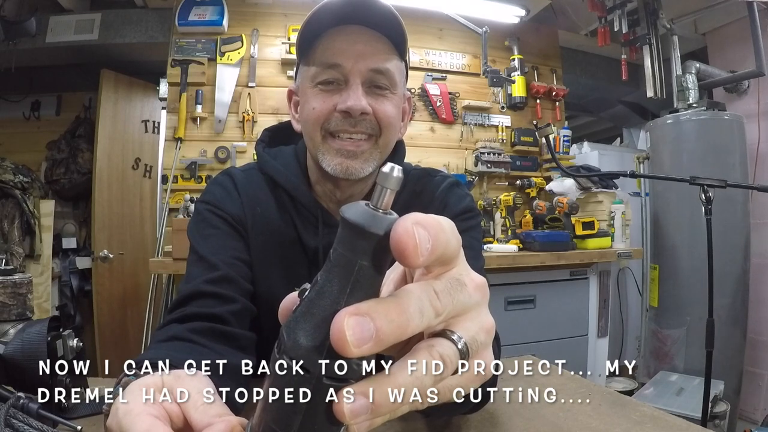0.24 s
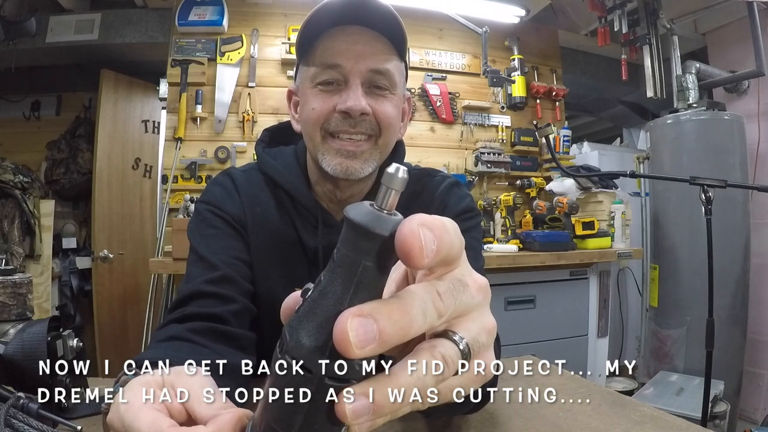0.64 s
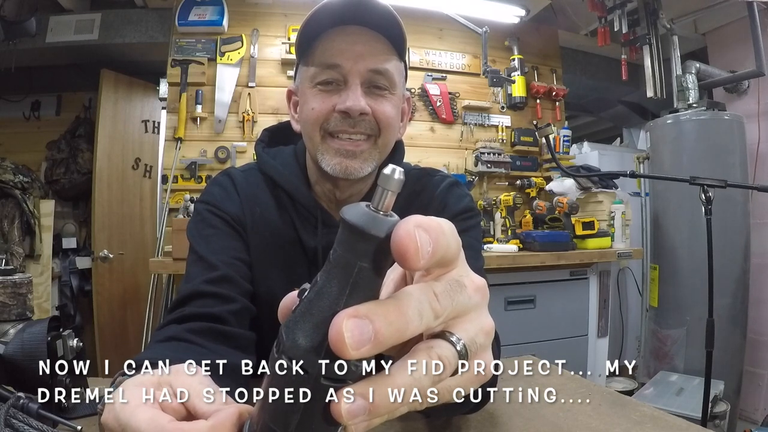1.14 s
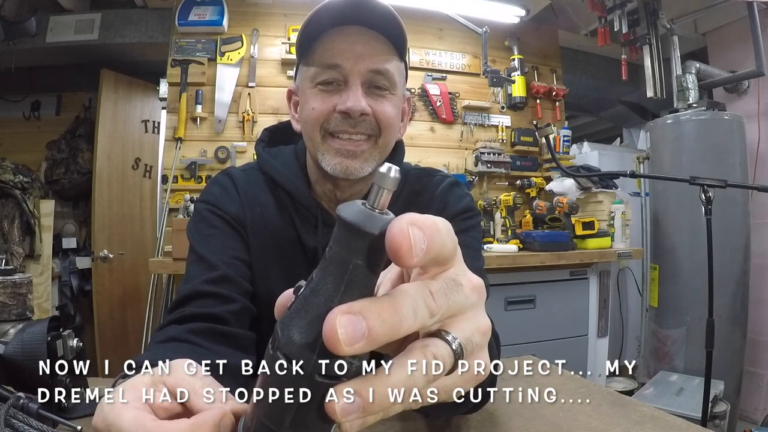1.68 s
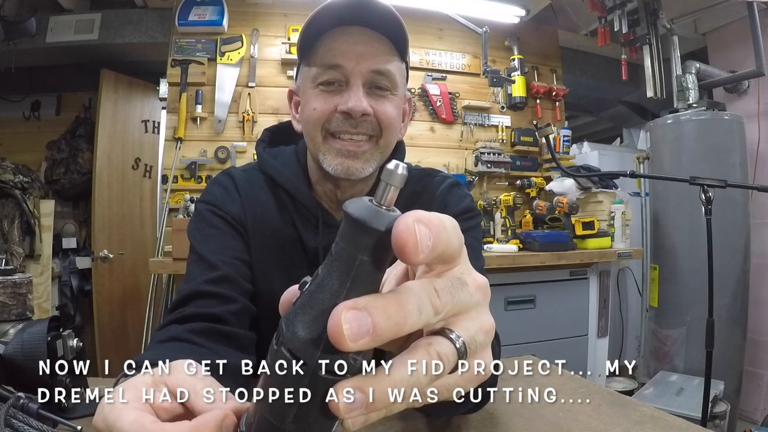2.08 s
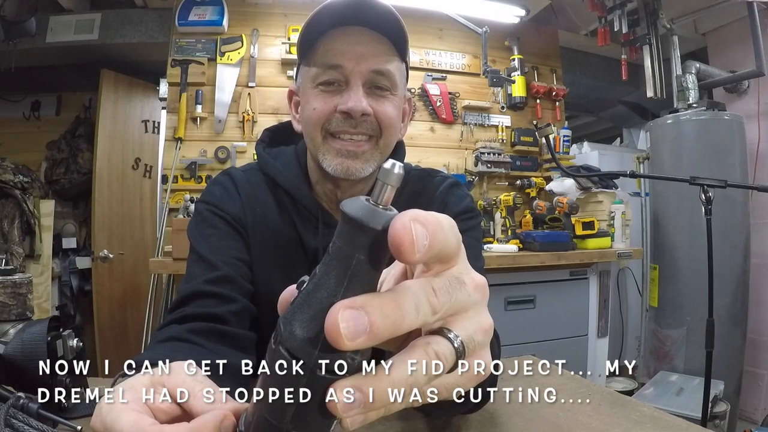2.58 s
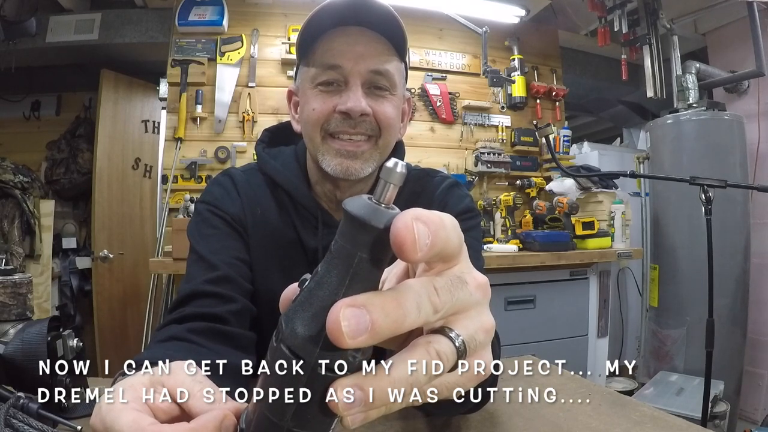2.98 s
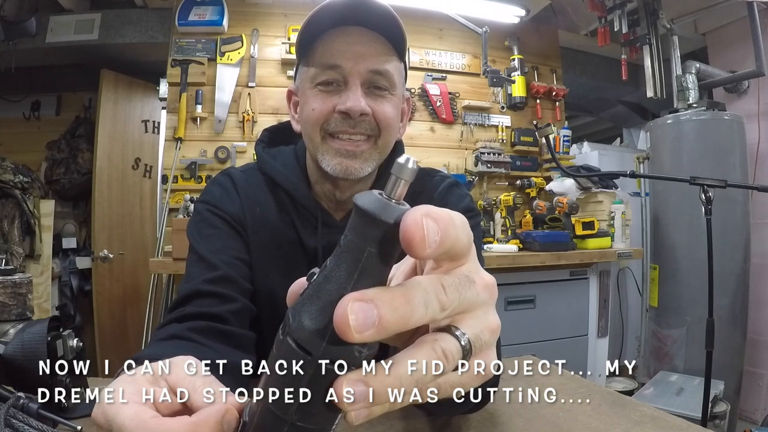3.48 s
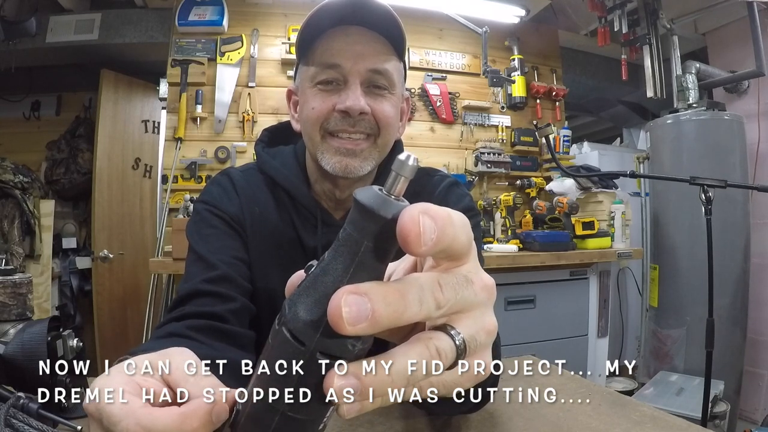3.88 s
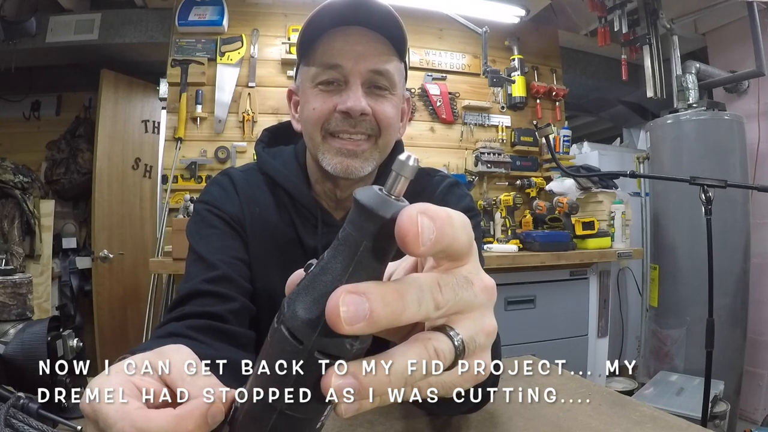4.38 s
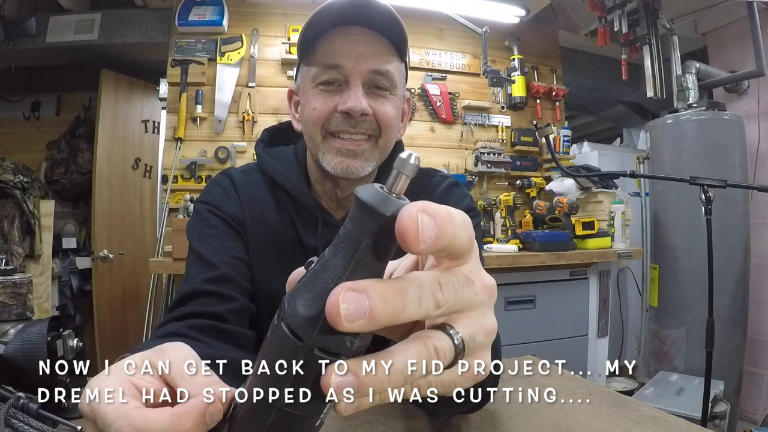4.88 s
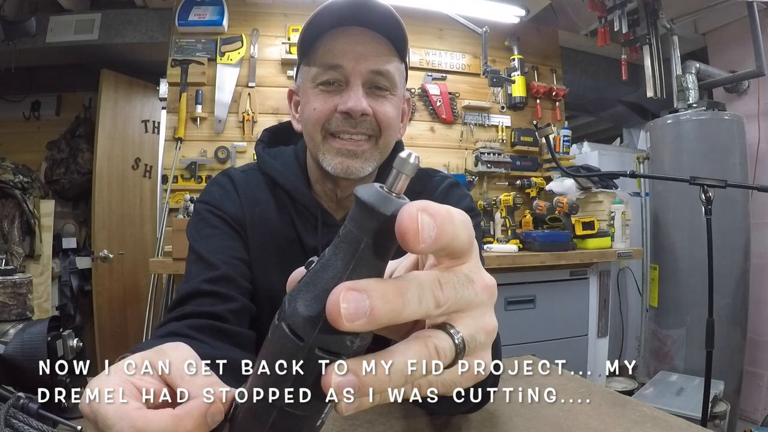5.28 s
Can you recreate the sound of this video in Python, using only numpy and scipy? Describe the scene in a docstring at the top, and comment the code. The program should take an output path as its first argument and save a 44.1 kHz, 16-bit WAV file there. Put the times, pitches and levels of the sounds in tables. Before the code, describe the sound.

A small handheld rotary tool runs freely close to the microphone in a small workshop. At 0 s it is already turning at low speed, a thin nasal whirr with a raspy mains-rate buzz. From about 0.4 to 1 s it accelerates sharply, its pitch more than doubling, with a brief harsh squeal as the motor frame resonates. From 1 to 2.7 s the climb flattens into a bright, shrill whine of many stacked harmonics, slightly wavering, with crackly brush hiss and rushing fan air. The peak comes near 2.75 s. Then the pitch glides steadily down, individual tones swelling and fading as they pass through resonances, the air thinning and electrical buzz returning after about 4 s. At 5.5 s it is still spinning, around half its top speed but faster than at the start. Short reflections, low room noise and faint hum remain underneath. Nothing is cut, and nobody speaks.

```python
"""A handheld rotary tool, running free, is dialled up to full speed and slowly back down in a small workshop.
Its shaft sings a stack of whines, harmonics of the rotation shaped by resonances of vents and housing.
The speed dial chops the mains current, so the armature buzzes, and squeals briefly whenever it sweeps
through a resonance of the motor frame. Filtered noise makes the brush hiss, pulsing with each turn,
and the fan air; a short reverberation, room noise and mains hum lie behind."""
import sys
import numpy as np
from scipy import signal
from scipy.fft import rfft, irfft
from scipy.io import wavfile
from scipy.ndimage import uniform_filter1d

SR = 44100
rng = np.random.default_rng(int(sys.argv[2]) if len(sys.argv) > 2 else 0)


def digitize_waveform(pressure):
    """Quantize a signal to 16-bit integers and store it at the path in sys.argv[1].

    Rows of a 2-D input are taken as channels; values are limited to [-1, 1].
    """
    field = np.atleast_2d(pressure).T
    bounded = np.clip(field, -1, 1)
    quanta = np.round(bounded * 32767).astype(np.int16)
    wavfile.write(sys.argv[1], SR, quanta)


N = 244478
TIME = np.arange(N) / SR  # seconds
FULL_HZ = 560  # shaft turns per second at full speed, the reference of the growth laws
CHOP_HZ = 120  # half cycles of the mains per second


def gain_of(db):
    """Level law: an amplitude ratio is ten to the power of decibels over twenty."""
    return 10 ** (np.asarray(db) / 20)


def evened(x):
    """Normalisation: dividing by the root mean square gives unit rms."""
    return x / np.sqrt(np.mean(x ** 2) + 1e-20)


def read(points, hz):
    """Spectral envelope: values are interpolated along a logarithmic frequency axis."""
    f, value = np.transpose(points)
    return np.interp(np.log(hz + 1), np.log(f + 1), value)


def course(points):
    """Control curve: straight lines join rows of time in seconds and value."""
    seconds, value = np.transpose(points)
    return np.interp(TIME, seconds, value)


def noise(points):
    """Coloured noise of rms 1: white noise is weighted by a spectral envelope."""
    hz = np.fft.rfftfreq(N, 1 / SR)
    spectrum = rfft(rng.standard_normal(N)) * gain_of(read(points, hz))
    return evened(irfft(spectrum, N))


def wander(rate_hz):
    """Slow random modulation of rms 1: white noise is low-passed near the given rate."""
    hz = np.fft.rfftfreq(N, 1 / SR)
    spectrum = rfft(rng.standard_normal(N)) / (1 + (hz / rate_hz) ** 4)
    return evened(irfft(spectrum, N))


def resonate(x, hz, width_hz):
    """Simple resonator: a two-pole filter passes a band around its centre, with unit gain there."""
    b, a = signal.iirpeak(hz, hz / width_hz, fs=SR)
    return signal.lfilter(b, a, x)


def response(resonances, hz):
    """Resonance curve: each mode responds as two resonators in series, and the modes' powers add."""
    grid = np.arange(0, SR, 8)
    power = 0
    for centre, width, db in resonances:
        detuning = 2 * (grid - centre) / width
        power = power + gain_of(db) ** 2 / (1 + detuning ** 2) ** 2
    return np.interp(hz, grid, np.sqrt(power))


def dial():
    """Rotational inertia: the shaft follows the dial with its changes rounded off."""
    # Shaft speed. Each row: time in seconds, speed in turns per second (Hz).
    speed_course = [(0, 170.7), (.177, 185.6), (.441, 224.2), (.6, 265), (.67, 298), (.76, 356.3),
                    (.93, 424.3), (1.126, 469.2), (1.372, 505.7), (1.641, 531.8), (1.962, 548.4),
                    (2.301, 559.6), (2.756, 565.9), (3.434, 523.7), (3.746, 498.9), (4.42, 414.8),
                    (4.888, 366), (5.431, 322.5), (5.54, 313.4)]
    return uniform_filter1d(course(speed_course), size=3000, mode="nearest")


def shaft(speed, drift=0.000431, flutter=0.00094):
    """Frequency modulation: bearing drag makes the speed waver, and its integral is the shaft angle."""
    # drift and flutter are rms fractions of the speed
    hz = speed * (1 + drift * wander(rate_hz=13.9) + flutter * wander(rate_hz=210))
    angle = 2 * np.pi * np.cumsum(hz) / SR
    return hz, angle


def beam(hz):
    """Directivity: high tones leave the tool in a beam, so their level depends on how it is held."""
    # Level approached by the highest tones as the tool shifts in the hand.
    # Each row: time in seconds, level in dB.
    treble_course = [(0, 3.5), (.8, 2.5), (1.3, .5), (1.75, 0.5), (2.6, -1), (3.3, -1.5), (4, -0.5),
                     (4.7, 1.5), (5.54, -15)]
    beam_hz = 6500  # half the dB change is reached here
    return gain_of(course(treble_course) / (1 + (beam_hz / hz) ** 4))


def gliding_tone(multiple, hz, angle, db, growth, resonances, shimmer_db, shimmer_hz):
    """Source and filter: a shaft harmonic grows as a power of speed and swells as it glides through resonances."""
    k = round(multiple)
    level = gain_of(db + shimmer_db * wander(rate_hz=shimmer_hz))
    strength = response(resonances, k * hz) * beam(k * hz) * (hz / FULL_HZ) ** growth * level
    return np.sqrt(2) * strength * np.sin(k * angle + 2 * np.pi * rng.random())


def whine(hz, angle, shimmer_db=1.5):
    """Harmonic radiation: the strongest tones of shaft, fan and commutator pass through the vents."""
    # Strongest tones. Each row: shaft multiple, relative level in dB at full speed,
    # power of speed that the amplitude grows with.
    whine_tones = [(3, 2.5, 1.75), (4, -1.7, 1.3), (5, -1.2, 2.76), (7, -1.1, 3.35), (18, 0, 1.9)]
    # Resonances of the air vents. Each row: centre in Hz, width in Hz, level in dB.
    vents = [(1084, 280, -38), (1447, 100, -40), (1775, 376, -29.5), (2320, 550, -34.5), (2623, 480, -26),
             (2970, 350, -26.5), (3500, 330, -30.5), (3894, 350, -28), (6900, 990, -26.4),
             (8650, 1500, -25.5), (10300, 940, -28.5)]
    out = np.zeros(N)
    for multiple, db, growth in whine_tones:
        out += gliding_tone(multiple, hz, angle, db, growth, vents, shimmer_db, shimmer_hz=7)
    return out


def overtones(hz, angle, low_growth=3.92, high_growth=1.46, shimmer_db=1.5):
    """Modal radiation: lesser harmonics excite the housing; the low ones grow fastest with speed."""
    # Lesser tones. Each row: shaft multiple, relative level in dB at full speed.
    lesser_tones = [(2, 2), (6, 5), (8, 3), (9, 0), (10, 1.9), (11, -1.7), (12, -1.5), (13, -1), (14, -4),
                    (15, -4), (16, 0), (17, 3.7), (19, -1), (20, 0.5), (21, 4), (22, -1), (23, 1), (24, 3),
                    (25, -9), (26, -11), (27, -11), (28, -3), (29, -7), (30, -11), (31, -18), (32, -2),
                    (33, -13), (34, -10), (35, -6), (36, -5)]
    # Resonances of the housing. Each row: centre in Hz, width in Hz, level in dB.
    housing = [(600, 280, -43.5), (1033, 217, -43), (2590, 390, -31.5), (2985, 170, -35.5),
               (3581, 310, -32.5), (4260, 500, -36.5), (4545, 110, -34), (4896, 414, -31), (5330, 420, -34),
               (6060, 800, -28), (6410, 150, -27), (6620, 497, -29), (7260, 240, -33), (7430, 1531, -33.5),
               (8500, 850, -31), (9000, 410, -33), (10340, 690, -36), (11500, 1439, -42),
               (12200, 1202, -43), (12925, 846, -46), (14400, 1400, -40)]
    growths = np.linspace(low_growth, high_growth, len(lesser_tones))
    out = np.zeros(N)
    for (multiple, db), growth in zip(lesser_tones, growths):
        out += gliding_tone(multiple, hz, angle, db, growth, housing, shimmer_db, shimmer_hz=7.9)
    return out


def chopped(hz, wide_open_hz=440):
    """Phase control: each mains half cycle passes one lump of current, shorter and harsher at low speed."""
    duty = np.clip(hz / wide_open_hz, .2, .78)  # fraction of the half cycle that conducts
    phase = TIME * CHOP_HZ % 1
    lump = np.sin(np.pi * np.minimum(phase / duty, 1))
    return np.sqrt(2 / duty) * lump  # a shorter lump is taller, for equal power


def current(speed):
    """Motor torque: the pull on the armature surges with acceleration and fades towards full speed."""
    pull_db = -32.5  # at a steady low speed
    doubling_hz_per_s, surge_power = 312, 1.8  # acceleration that doubles the pull; steepness of the surge
    smooth_hz, smooth_power = 447, 8.8  # speed above which the current smooths out; steepness of the fade
    acceleration = uniform_filter1d(np.gradient(speed) * SR, size=3000)  # Hz per second
    surge = 1 + (np.maximum(acceleration, 0) / doubling_hz_per_s) ** surge_power
    return gain_of(pull_db) * surge / (1 + (speed / smooth_hz) ** smooth_power)


def buzz(angle, drive, uneven_db=-0.8, chatter_db=-8, chatter_hz=2850, chatter_width_hz=900):
    """Forced vibration: uneven, chattering pull on the armature slots, in bursts of current, rings the frame."""
    # Tones of the slots passing the poles. Each row: shaft multiple, relative level in dB.
    slot_tones = [(8, 4.5), (9, -14), (14, -12), (16, -1.5), (18, -14), (24, -15), (32, -11)]
    # Resonances of the motor frame. Each row: centre in Hz, width in Hz, relative level in dB.
    frame = [(2702, 365, -3), (3570, 800, -7), (6560, 750, 2.5), (10400, 600, -6)]
    slots = np.zeros(N)
    for multiple, db in slot_tones:
        level = gain_of(db + uneven_db * wander(rate_hz=150))
        slots += np.sqrt(2) * level * np.sin(round(multiple) * angle)
    chatter = evened(resonate(rng.standard_normal(N), chatter_hz, chatter_width_hz))
    pull = drive * (slots + gain_of(chatter_db) * chatter)
    out = np.zeros(N)
    for centre, width, db in frame:
        once = resonate(pull, centre, width)
        out += gain_of(db) * resonate(once, centre, width)
    return out


def sparks(per_s=140, size=1.1):
    """Shot process: brushes skip at random, each skip a spurt of extra hiss that decays exponentially."""
    skips = (rng.random(N) < per_s / SR) * size * rng.random(N)
    decay = np.exp(-1 / 20)  # time constant of 20 samples
    return 1 + signal.lfilter([1], [1, -decay], skips)


def brushes(hz, angle, lumps, once=0.26, twice=0.19, chop=0.023, flicker_db=.5):
    """Friction noise: rubbing hiss follows the speed, modulated by each turn and by the current."""
    # Hiss of brushes on the commutator. Each row: frequency in Hz, relative level in dB per Hz.
    brush_spectrum = [(400, -25.5), (750, -18), (1100, -10.5), (2000, -9.5), (4400, -12.5), (5200, -6),
                      (5750, -7.5), (6150, -1.5), (6750, -1), (7150, -5.5), (8100, 0.5), (8900, -3.5),
                      (9600, -11), (10400, -11), (15000, -22)]
    brush_db, peak_hz = -23, 497  # level at the loudest speed; that speed in turns per second
    growth, ease = 1.2, 3.4  # powers of speed: rise below the peak, fall above it
    ratio = hz / peak_hz
    strength = np.minimum(ratio ** growth, ratio ** -ease)
    turning = 1 + once * np.cos(angle) + twice * np.sin(2 * angle)
    contact = evened(turning * (1 + chop * lumps) * sparks())
    level = gain_of(brush_db + flicker_db * wander(rate_hz=29))
    return level * strength * contact * noise(brush_spectrum)


def fan(hz, angle, swirl=0.14):
    """Aerodynamic noise: swirling cooling air grows as a power of speed and pulses once a turn."""
    # Air from the cooling fan. Each row: frequency in Hz, relative level in dB per Hz.
    air_spectrum = [(200, -38), (380, -23.5), (520, -9.5), (750, -15.5), (1100, -7), (1600, -4), (2400, 5),
                    (3300, 0), (4400, 0), (5500, 0), (6300, 8), (7500, 2.5), (10000, -0.5), (12000, 0.5),
                    (15000, -3)]
    air_db, growth = -21.5, 2.07  # level at full speed; power of speed
    pulsing = evened(1 + swirl * np.cos(angle))
    return gain_of(air_db) * (hz / FULL_HZ) ** growth * pulsing * noise(air_spectrum)


def workshop(x):
    """Reverberation: dense reflections from bench and walls, each band dying at its own speed."""
    # Ring of the workshop. Each row: frequency in Hz, time in seconds to decay by 60 dB.
    decay_times = [(300, 0.95), (2500, 0.21), (12000, 0.32)]
    count, first, spacing = 700, 120, 22  # reflections; delay of the first and mean spacing in samples
    taps = np.zeros(SR // 2)
    delays = first + spacing * np.arange(count) + rng.integers(0, spacing, count)
    taps[delays] = rng.choice([-1., 1.], count)
    hz, t, bands = signal.stft(taps, SR, nperseg=256)
    decay = gain_of(-60 * t / read(decay_times, hz)[:, None])
    tail = signal.istft(bands * decay, SR, nperseg=256)[1]
    return signal.fftconvolve(x, tail / np.linalg.norm(tail))[:N]  # tail of unit energy


def background(floor_db=-51):
    """Ambient noise: low-weighted room noise with steady harmonics of the mains added."""
    # Noise of the workshop. Each row: frequency in Hz, relative level in dB per Hz.
    floor_spectrum = [(20, -12), (48, -6), (62, 1), (95, 4), (150, -4.5), (220, -4.5), (330, -11),
                      (700, -18.5), (3000, -26), (15000, -30)]
    # Mains hum. Each row: frequency in Hz, rms level in dB.
    hum_tones = [(120, -56), (240, -61.5)]
    hum = np.zeros(N)
    for hz, db in hum_tones:
        hum += np.sqrt(2) * gain_of(db) * np.sin(2 * np.pi * hz * TIME)
    return gain_of(floor_db) * noise(floor_spectrum) + hum


def scene(whine_wet_db=-13, overtone_wet_db=-11, rush_wet_db=-12, buzz_wet_db=-18):
    """Superposition: the speed drives every layer of the tool, close to one microphone, the room behind."""
    speed = dial()
    hz, angle = shaft(speed)
    lumps = chopped(hz)
    rush = brushes(hz, angle, lumps) + fan(hz, angle)
    armature = buzz(angle, current(speed) * lumps)
    parts = np.array([whine(hz, angle), overtones(hz, angle), rush, armature])
    sends = gain_of([whine_wet_db, overtone_wet_db, rush_wet_db, buzz_wet_db])
    room = workshop(sends @ parts)
    mono = parts.sum(axis=0) + room + background()
    return np.tile(mono, (2, 1))  # the same in both channels


def record(dry):
    """Band limiting: the recorder's steep linear-phase low-pass removes the highest treble."""
    edge_hz = 15430
    lowpass = signal.firwin(611, edge_hz, window=("kaiser", 9), fs=SR)
    return signal.oaconvolve(dry, lowpass[None], "same")


dry = scene()
out = record(dry)
digitize_waveform(out)
```